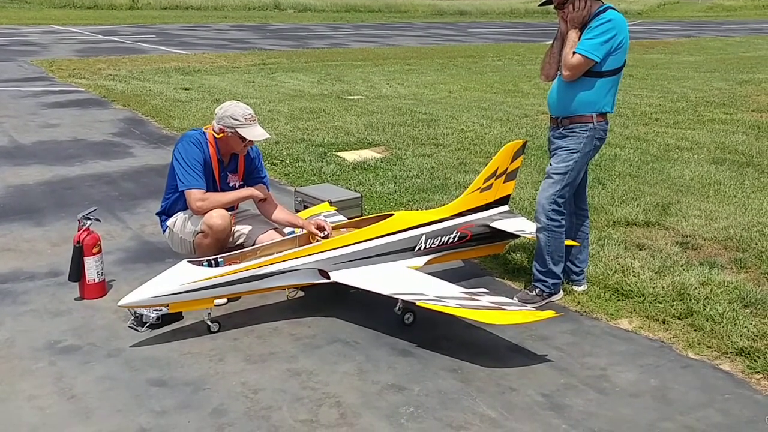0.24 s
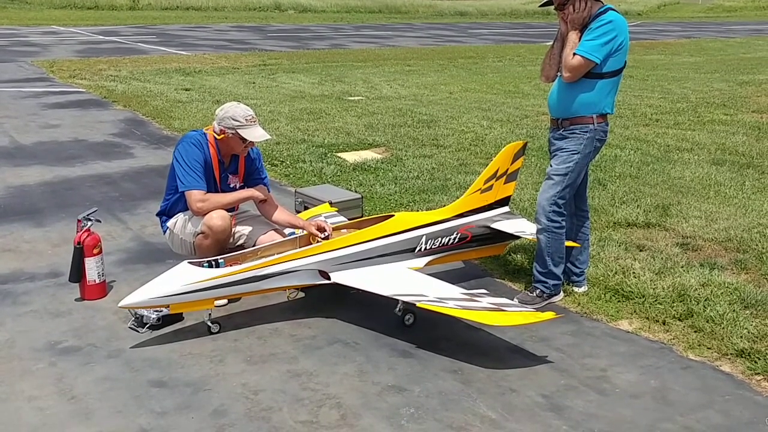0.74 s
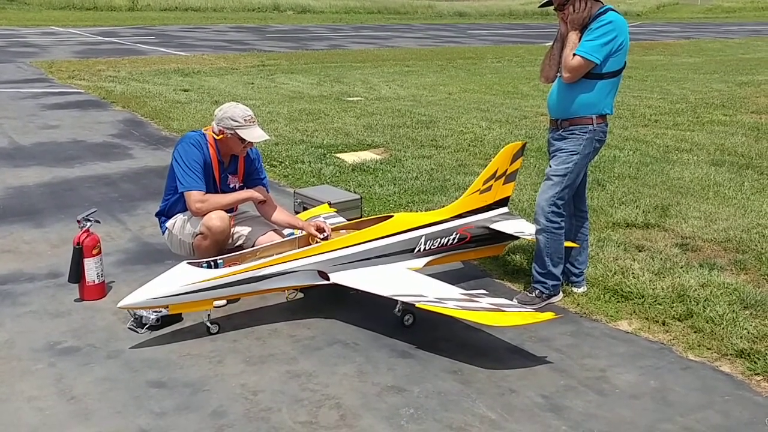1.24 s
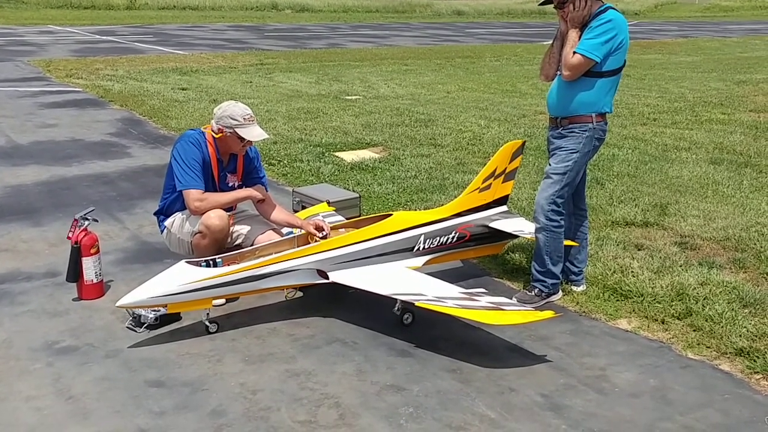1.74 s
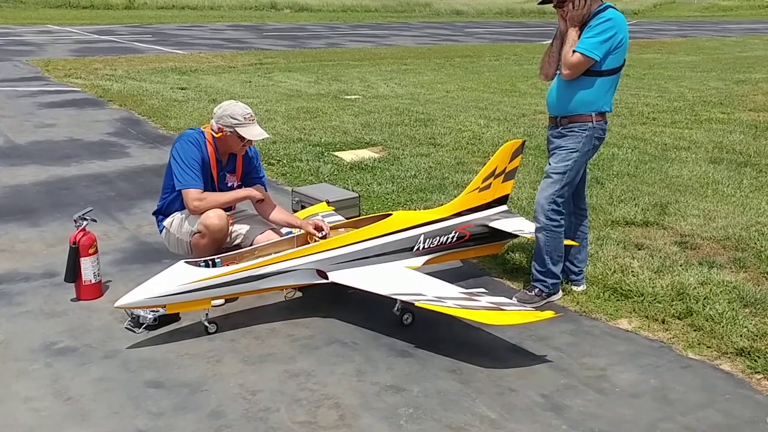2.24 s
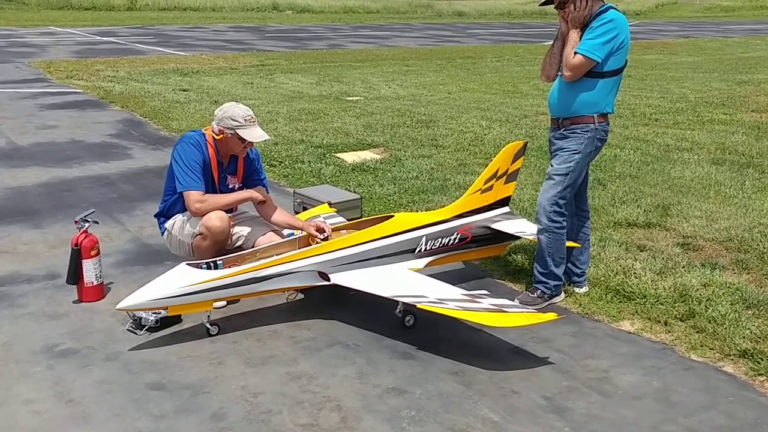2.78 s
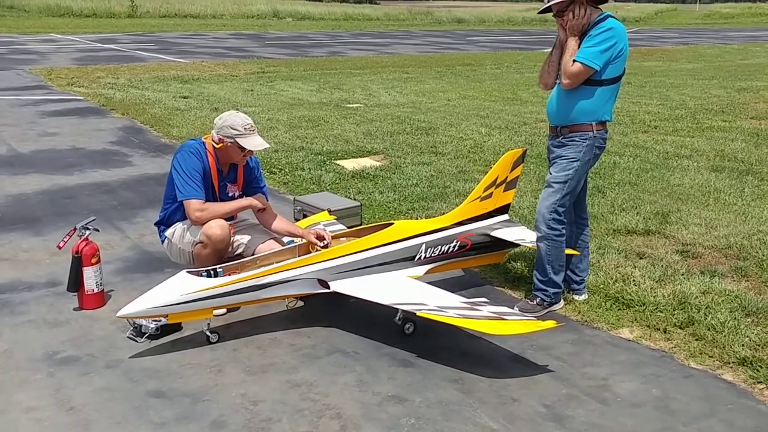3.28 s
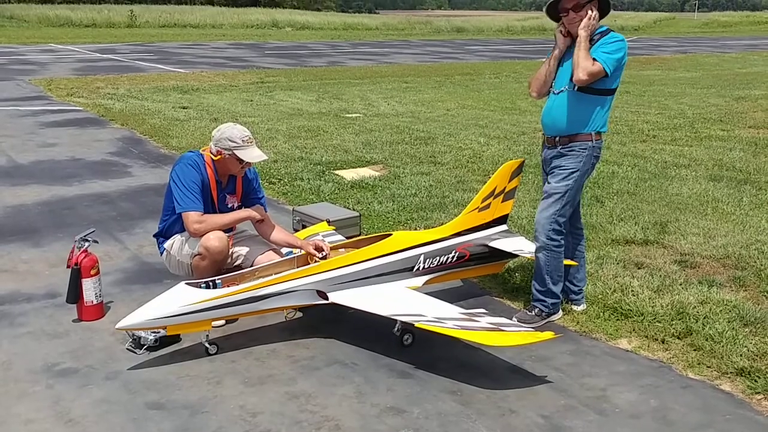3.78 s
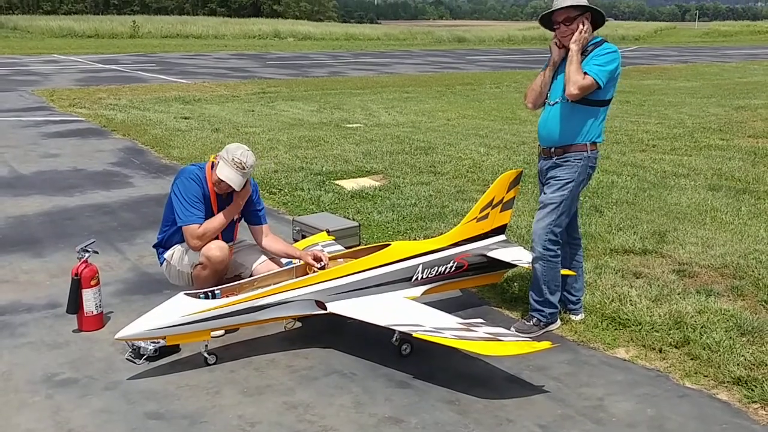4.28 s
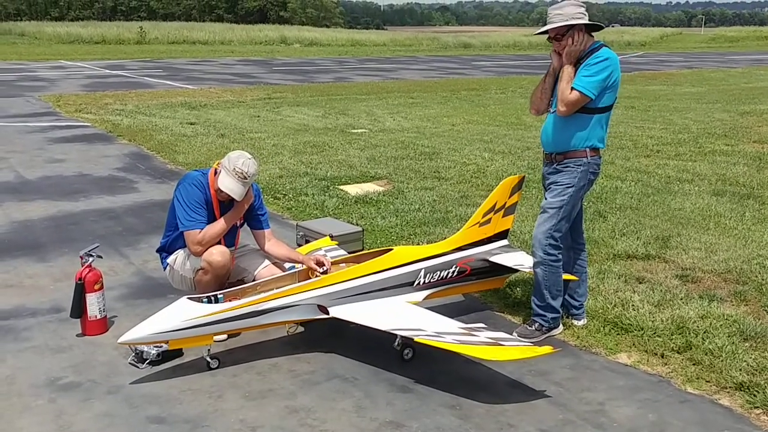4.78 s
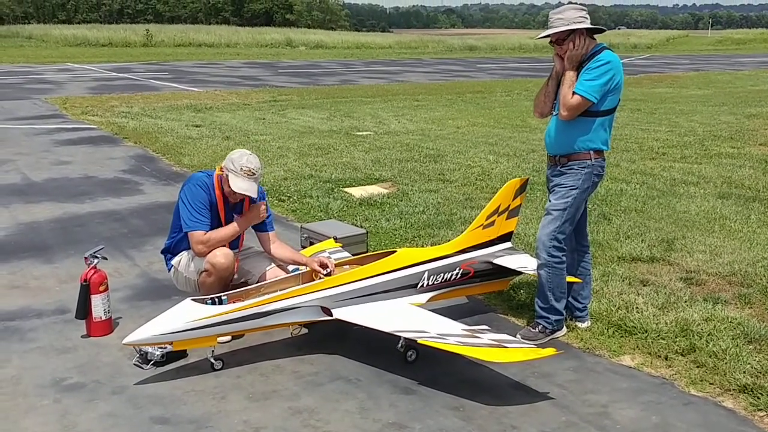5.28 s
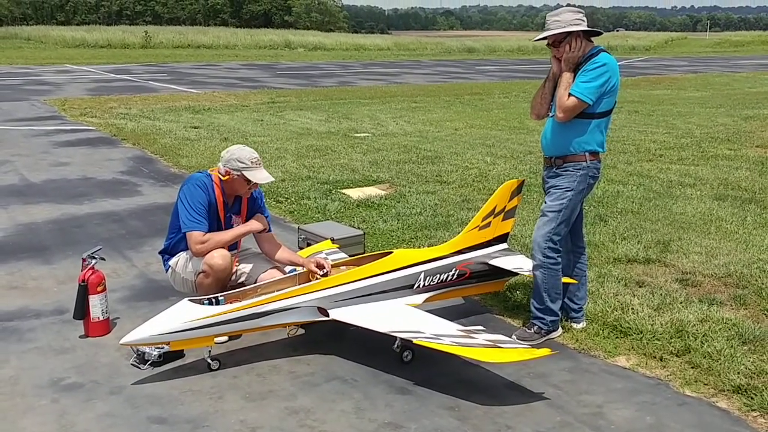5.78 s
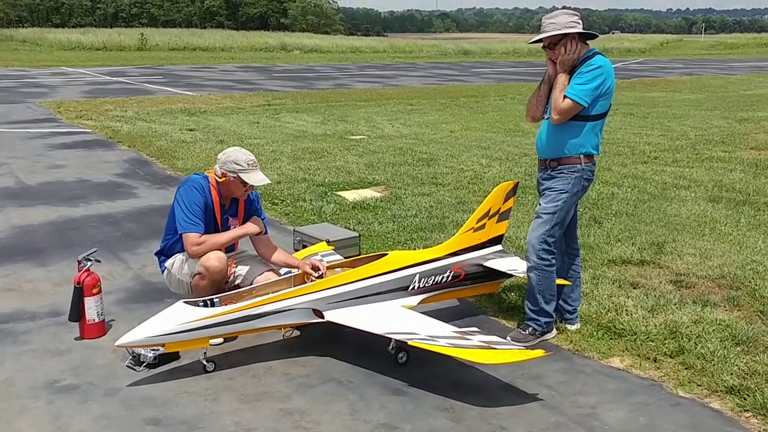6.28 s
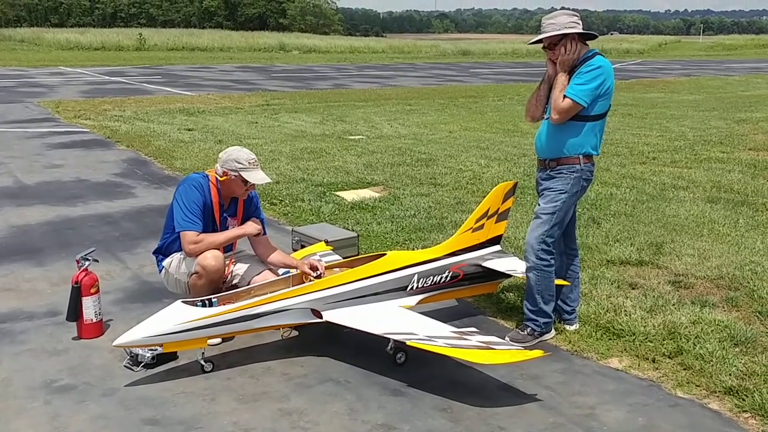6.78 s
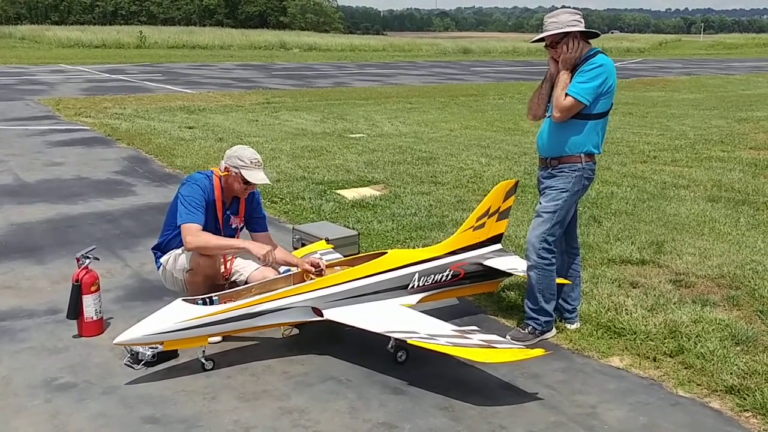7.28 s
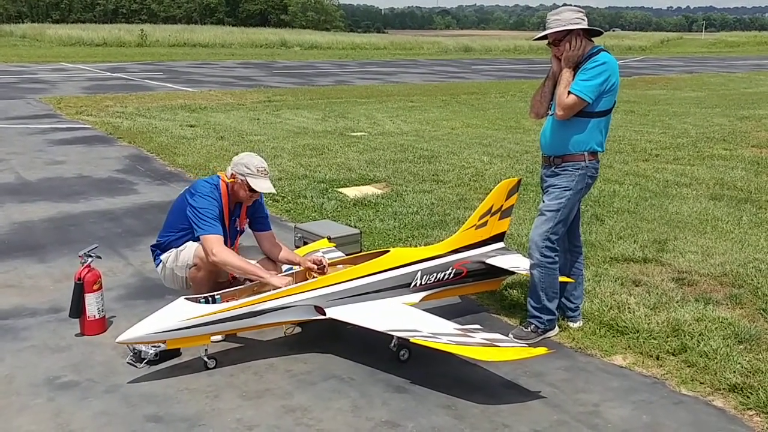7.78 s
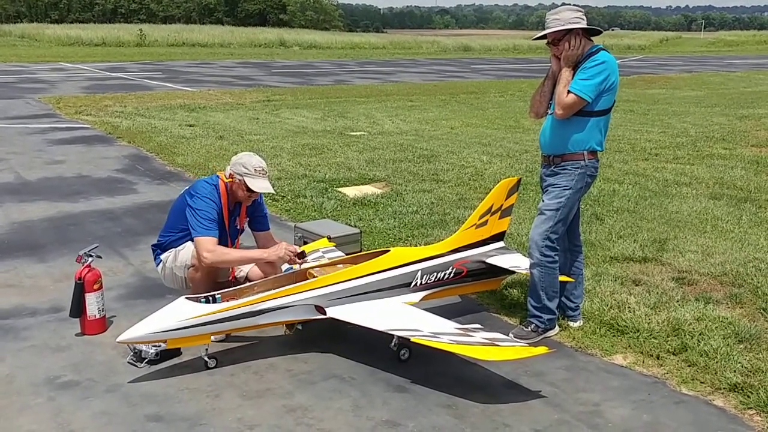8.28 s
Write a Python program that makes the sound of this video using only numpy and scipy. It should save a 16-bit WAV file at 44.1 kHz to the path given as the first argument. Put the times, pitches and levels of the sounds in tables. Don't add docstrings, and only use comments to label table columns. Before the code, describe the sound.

From 0 s a small turbine on a model jet is already whining loudly, a piercing, almost pure tone near 5 kHz with a fainter shrill octave above. It glides upward without a break, around 5.7 kHz at 3 s, 6.6 kHz at 5 s and 7.3 kHz at 7 s, then levels near 7.45 kHz from about 7.5 s to the end at 8.5 s. The tone shimmers, dips briefly and slides between left and right, stronger on the right at first. Under it, a hollow tailpipe hum around 550 Hz gradually sinks while duct and intake hiss brightens. Low, uneven wind puffs bump the microphone, most in the first 3 s, with a sharper left-side one near 5.4 s. Open, dry outdoor space; a phone a few metres away sounds compressed, crunchy and slightly overloaded.

```python
import sys
import numpy as np
from scipy import signal
from scipy.fft import rfft, irfft
from scipy.io import wavfile
from scipy.ndimage import uniform_filter1d, minimum_filter1d

SR = 44100
rng = np.random.default_rng(int(sys.argv[2]) if len(sys.argv) > 2 else 0)


def volts_from_decibels(level):
    exponent = np.asarray(level, float) / 20
    return 10 ** exponent


def put_to_file(sound):
    columns = np.atleast_2d(sound).T
    safe = np.clip(columns, -1, 1)
    whole_steps = np.round(safe * 32767)
    wavfile.write(sys.argv[1], SR, whole_steps.astype(np.int16))


N = 376168
FREQ_HZ = np.fft.rfftfreq(N, 1 / SR)
TOP_HZ = 15760
LEAD_S = 4.5e-5

# t/s, f/Hz
BLADE_RATE = [(0.0, 4934), (1.2, 5225), (1.8, 5386), (2.4, 5548), (3.0, 5747), (3.6, 5984), (4.0, 6165),
              (4.4, 6368), (5.0, 6632), (5.4, 6795), (5.9, 6985), (6.45, 7193), (6.95, 7342), (7.3, 7400),
              (7.67, 7462), (8.06, 7476), (8.3, 7470), (8.53, 7457)]
# t/s, left level/dB, right level/dB, octave left level/dB, octave right level/dB
PATH_LEVELS = [(0.0, -11.1, -2.0, -20.0, -20.0), (1.4, -7.0, -5.0, -12.0, -20.0),
               (3.0, -6.4, -6.8, -14.0, -28.0), (4.6, -8.4, -3.9, -28.0, -28.0),
               (6.5, -6.4, -4.5, -7.0, -36.0), (8.53, -5.3, -4.3, -23.0, -33.0)]
# t/s, x0.5 left level/dB, x0.5 right level/dB, x1.5 left level/dB, x1.5 right level/dB
SPLITTERS = [(0, -48, -48, -40, -34), (1.16, -47, -46, -43, -43), (1.75, -56, -53, -50, -52),
             (2.4, -40, -50, -39, -48), (3, -34, -38, -49, -58), (4.5, -35, -43, -38, -49),
             (5.3, -34, -43, -33, -43), (5.85, -25, -30, -28, -46), (6.2, -25, -35, -37, -55),
             (6.46, -35, -39, -39, -47), (6.66, -28, -31, -42, -50), (7.2, -38, -45, -42, -52),
             (7.6, -31, -35, -28, -38), (8.53, -32, -36, -33, -35)]
# t/s, left level/dB, right level/dB
TRIPLE = [(0, -38, -37), (.25, -26, -41), (.6, -38, -46), (1.15, -27, -47), (1.5, -38, -46)]
# t/s, left level/dB, right level/dB
FIVE_HALVES = [(0, -47, -44), (1, -51, -66.5), (3, -55, -55), (3.7, -45, -63), (4.1, -31, -50),
               (4.5, -32, -55)]
# t/s, lead/cycles
PORT_LEAD = [(0.0, 1.08), (0.6, 0.24), (1.3, 0.48), (2.0, 0.34), (2.7, 0.65), (3.4, 0.57), (4.0, 1.02),
             (4.6, 0.5), (5.2, 1.09), (5.8, 0.78), (6.4, 0.12), (6.8, 0.21), (7.1, 0.11), (7.4, -0.42),
             (7.7, 0.13), (8.1, 0.33), (8.53, 0.65)]
# t/s, half length/s, depth/dB, slip/cycles
FADES_LEFT = [(0.213, 0.233, 7.6, 0.21), (0.457, 0.073, 3.8, 0.3), (1.161, 0.088, 9.6, 0.69),
              (1.775, 0.078, 2.4, 0.25), (2.375, 0.049, 13.0, 0.6), (2.698, 0.025, 3.6, 0.12),
              (2.867, 0.086, 12.2, -0.37), (3.244, 0.047, 7.2, 0.68), (3.609, 0.084, 2.0, -0.67),
              (3.749, 0.076, 14.8, 0.54), (4.126, 0.077, 4.4, 0.89), (4.389, 0.054, 6.5, -0.47),
              (4.951, 0.042, 12.3, -0.9), (5.239, 0.047, 3.0, 0.41), (5.391, 0.034, 4.0, -0.14),
              (5.699, 0.074, 6.2, 0.04), (6.16, 0.063, 12.3, 0.66), (6.365, 0.101, 2.6, 0.66),
              (6.629, 0.09, 2.8, 0.12), (6.771, 0.029, 0.0, -0.18), (7.178, 0.106, 1.6, 0.67),
              (7.349, 0.123, 0.0, 0.28), (7.47, 0.085, 1.1, -0.32), (7.678, 0.031, 3.4, -0.25),
              (8.242, 0.012, 3.2, 0.23), (8.246, 0.203, 1.4, -0.82), (8.337, 0.017, 4.5, -0.06)]
# t/s, half length/s, depth/dB, slip/cycles
FADES_RIGHT = [(0.1, 0.131, 19.3, 0.29), (0.361, 0.095, 7.8, -0.11), (0.641, 0.14, 12.5, -0.79),
               (0.918, 0.078, 5.9, 0.32), (1.175, 0.158, 6.1, -0.08), (2.181, 0.054, 6.5, 0.51),
               (2.235, 0.234, 1.9, -0.16), (2.843, 0.045, 7.3, -0.6), (3.164, 0.055, 6.3, -0.23),
               (3.439, 0.051, 7.8, -0.51), (3.914, 0.037, 8.0, 0.48), (4.124, 0.013, 13.1, 0.75),
               (4.219, 0.179, 6.6, 0.27), (4.329, 0.029, 13.9, 0.06), (4.639, 0.063, 2.1, 0.23),
               (4.807, 0.078, 0.9, 0.33), (5.125, 0.046, 2.0, 0.21), (5.516, 0.027, 14.4, 0.62),
               (5.619, 0.158, 2.4, -0.9), (6.265, 0.012, 3.2, 0.03), (6.563, 0.179, 1.6, 0.64),
               (7.419, 0.046, 0.0, 0.15), (8.456, 0.037, 1.9, 0.03)]
# t/s, half length/s, depth/dB
OCTAVE_FADES_LEFT = [(0.17, 0.04, 16.0), (0.56, 0.05, 15.0), (0.77, 0.11, 6.0), (1.44, 0.09, 8.0),
                     (1.69, 0.11, 12.0), (2.28, 0.2, 16.0), (2.69, 0.13, 17.0), (3.12, 0.06, 10.0),
                     (3.37, 0.04, 10.0), (3.63, 0.25, 11.0), (4.21, 0.02, 12.0), (5.59, 0.11, 14.0),
                     (5.96, 0.3, 11.0), (6.72, 0.3, 21.0), (7.36, 0.26, 15.0), (7.91, 0.19, 10.0)]
# t/s, half length/s, depth/dB
OCTAVE_FADES_RIGHT = [(0.41, 0.07, 19.0), (0.59, 0.08, 18.0), (1.05, 0.07, 12.0), (1.62, 0.05, 17.0),
                      (1.84, 0.3, 8.0), (2.6, 0.03, 16.0), (4.49, 0.1, 16.0), (6.75, 0.16, 13.0),
                      (7.0, 0.11, 11.0), (7.11, 0.04, 15.0)]
# f/Hz, level/dB per Hz
TAILPIPE = [(170, -55), (220, -51), (250, -51.5), (390, -50.5), (440, -45), (500, -38.5), (550, -34),
            (595, -37), (640, -47.5), (680, -47.5), (740, -58.5), (1090, -59), (1180, -67), (1250, -62.5)]
# f/Hz, level/dB per Hz
DUCT = [(1410.0, -65), (1850.0, -66), (2240.0, -62.5), (2390.0, -68.5), (2700.0, -66.5), (2890.0, -59),
        (3190.0, -61), (3290.0, -55), (3370.0, -56.5), (3460.0, -54.5), (3700.0, -62.5), (4230.0, -59.5),
        (4680.0, -63.5), (5090.0, -63.5)]
# f/Hz, level/dB per Hz
INTAKE = [(5250.0, -61.5), (7270.0, -60.5), (8540.0, -67.5), (9000.0, -72.5), (9800.0, -65), (10520.0, -61),
          (12390.0, -72), (12660.0, -75.5), (13030.0, -73), (13390.0, -70), (15200.0, -76), (15590.0, -77)]
# f/Hz, left minus right level/dB
BODY_SHADOW = [(300.0, 2), (2330.0, 0.5), (2910.0, 2), (3520.0, 2.5), (4250.0, -2), (5390.0, 2),
               (6660.0, -6), (8300.0, 4.5), (9040.0, 1.8), (10280.0, 10.5), (11150.0, 3.5), (12720.0, 5),
               (15590.0, 11.5)]
# f/Hz, share/0-1
LIKENESS = [(100, 0.7), (250, .85), (500, 1), (1200, .8), (2400, .65), (3300, .85), (4000, .55),
            (8000, .25)]
SPOOL_EDGES_HZ = [0, 400, 750, 5000, 9000, 11800, 27000]
SPOOL_DB = [0, -4, 0.2, 4, 4.5, 7.5]
# f/Hz, level/dB per Hz
BUFFET = [(15, -18), (33, -17.5), (60, 0.5), (120, -5), (200, -8.5), (350, -10.5), (800, -33.5),
          (3000, -56.5)]
# t/s, half length/s, left level/dB, right level/dB
GUSTS = [(0, 0.092, -21, -38), (0.397, 0.14, -15, -18), (0.638, 0.15, -28, -13.5), (1.127, .09, -18, -18.5),
         (1.437, .15, -28, -28), (2.02, 0.07, -34, -22.5), (2.292, .15, -26.5, -18),
         (2.622, 0.081, -28, -17), (3.848, 0.037, -35, -45), (4.73, 0.078, -24.5, -36),
         (5.138, 0.069, -33, -21.5), (5.395, 0.043, -9.5, -39), (5.5, 0.053, -26, -24),
         (6.065, 0.1, -23.5, -48), (7.247, 0.14, -31.5, -48), (7.626, 0.061, -35, -35),
         (8.05, .12, -32, -45)]
# f/Hz, level/dB per Hz
MASKED = [(300, -81.5), (2500, -70), (5000, -67.5), (9000, -70.5), (10500, -71.5), (12500, -70),
          (15500, -78)]


def columns(table):
    t_s, *rest = np.transpose(table)
    return np.array([np.interp(np.arange(N) / SR, t_s, c) for c in rest])


def shape(points):
    hz, value = np.transpose(points)
    return np.interp(np.log(FREQ_HZ + 1), np.log(hz), value)


def white():
    return rfft(rng.standard_normal(N)) * np.sqrt(SR / 2)


def walk(rate_hz):
    k = int(SR / rate_hz)
    held = np.repeat(rng.standard_normal(N // k + 1), k)
    return 1.8 * uniform_filter1d(uniform_filter1d(held, k), k)[:N]


def whine(left_db, right_db, octave_left_db, octave_right_db, lead_cycles):
    hz = columns(BLADE_RATE)[0]
    turn = 2 * np.pi * np.cumsum(hz) / SR
    halves_db = columns(SPLITTERS)
    tones = [
        (1, [left_db, right_db]),
        (2, [octave_left_db, octave_right_db]),
        (0.5, halves_db[:2]),
        (1.5, halves_db[2:]),
        (3, columns(TRIPLE)),
        (2.5, columns(FIVE_HALVES)),
    ]
    out = 0
    for k, db in tones:
        shimmer_db = 0.6 * (k + 0.5) * np.array([walk(30), walk(30)])
        shimmer_db = shimmer_db + 3 * (k % 1 > 0) * walk(6)
        wobble = 0.065 * k * np.array([walk(30), walk(30)])
        shift = lead_cycles if k % 1 == 0 else LEAD_S * hz
        phase = k * (turn + np.pi * np.array([shift, -shift])) + wobble
        in_range = k * hz < TOP_HZ + 300
        out = out + np.sqrt(2) * volts_from_decibels(db + shimmer_db) * np.sin(phase) * in_range
    return out


def dips(table, t_s):
    centre_s, half_s, depth_db = np.transpose(table)[:3, :, None]
    u = (t_s - centre_s) / half_s
    return np.sum(depth_db * np.exp(-u ** 2), axis=0), u


def paths():
    coarse = np.arange(0, N, 64)

    def full(v):
        return np.interp(np.arange(N), coarse, v)

    tables = (FADES_LEFT, FADES_RIGHT, OCTAVE_FADES_LEFT, OCTAVE_FADES_RIGHT)
    fades = [dips(table, coarse / SR) for table in tables]
    slips = [np.transpose(table)[3] @ np.arctan(2 * u) / np.pi
             for table, (_, u) in zip(tables[:2], fades)]
    db = columns(PATH_LEVELS) - np.array([full(loss_db) for loss_db, _ in fades])
    return *db, columns(PORT_LEAD)[0] + full(slips[0] - slips[1])


def rush():
    hz = columns(BLADE_RATE)[0]
    speed = ((hz - hz.min()) / np.ptp(hz)) ** 1.4
    speed = speed - speed.mean()
    like = np.clip(shape(LIKENESS), 0, 1)
    engine_db = shape([(30, -75), (70, -57), (135, -48.5), *TAILPIPE, *DUCT, *INTAKE])
    shared = white()
    flicker_db = [0.82 * walk(7) + 0.55 * walk(1.504) for _ in SPOOL_DB]
    out = np.zeros((2, N))
    for side, lag_s in enumerate((0, LEAD_S)):
        colour_db = engine_db + (0.5 - side) * shape(BODY_SHADOW)
        common = np.sqrt(like) * shared * np.exp(-2j * np.pi * FREQ_HZ * lag_s)
        heard = common + np.sqrt(1 - like) * white()
        for lo, hi, db, flick_db in zip(SPOOL_EDGES_HZ, SPOOL_EDGES_HZ[1:], SPOOL_DB, flicker_db):
            band = irfft(heard * volts_from_decibels(colour_db) * (FREQ_HZ >= lo) * (FREQ_HZ < hi), N)
            out[side] += band * volts_from_decibels(db * speed + flick_db)
    return out


def gusts():
    breeze_db, breeze_db_per_s = -30, -1.62
    t_s = np.arange(N) / SR
    power = volts_from_decibels(2 * (breeze_db + breeze_db_per_s * t_s)) * np.ones((2, 1))
    for centre_s, half_s, *db in GUSTS:
        swell = np.exp(-((t_s - centre_s) / half_s) ** 2)
        power = power + volts_from_decibels(2 * np.array(db))[:, None] * swell
    return 10 * np.log10(power)


def wind(gust_db):
    eddies = np.array([irfft(white() * volts_from_decibels(shape(BUFFET)), N) * volts_from_decibels(2.2 * walk(11)) for _ in gust_db])
    return eddies / eddies.std(axis=1, keepdims=True) * volts_from_decibels(gust_db + 1.7)


def scene():
    open_db = np.array([[4], [6.5]])
    duck_db = np.array([[15], [21]])
    duck_s, air_s, air_share = 0.13, 0.55, 1.5
    drops_s, drop_s = [1.1, 5.325, 6.27, 7.175], 0.011
    heard = paths()
    engine, breeze = rush(), wind(gusts())
    power = uniform_filter1d(volts_from_decibels(2 * np.array(heard[:2])), int(duck_s * SR), axis=1)
    power = power + air_share * uniform_filter1d((engine + breeze) ** 2, int(air_s * SR), axis=1)
    gain_db = open_db - duck_db * power
    tones = whine(*heard)
    lost = sum(np.exp(-((np.arange(N) / SR - s) / drop_s) ** 4) for s in drops_s)
    tones = tones - lost * tones.mean(axis=0)
    return volts_from_decibels(-0.22) * tones + volts_from_decibels(gain_db) * engine + volts_from_decibels(1.5) * breeze


def limit(x, top, hold_s):
    k = int(hold_s * SR)
    need = minimum_filter1d(np.minimum(1, top / (np.abs(x) + 1e-9)), k, axis=1)
    return x * uniform_filter1d(need, k, axis=1)


def squeeze(x, coarse, grain, spread_db, port_db, size=1024, count=8):
    n, k = np.arange(2 * size) + 0.5, np.arange(size) + 0.5
    window = np.sin(np.pi * n / (2 * size))[:, None]
    basis = np.sqrt(2 / size) * window * np.cos(np.pi / size * np.outer(n + size / 2, k))
    blocks = np.pad(x, ((0, 0), (size, 2 * size - N % size))).reshape(2, -1, size)
    lines = np.concatenate([blocks[:, :-1], blocks[:, 1:]], axis=2) @ basis
    bands = lines.reshape(2, -1, size // count, count)
    hz, db = np.transpose(MASKED)
    centre_hz = (np.arange(size // count) + 0.5) * count * SR / (2 * size)
    whole = rng.standard_normal((1, bands.shape[1], 1))
    groups = np.repeat(rng.standard_normal((1, bands.shape[1], bands.shape[2] // 4)), 4, axis=2)
    wander = uniform_filter1d(whole + groups, size=3, axis=1)
    mask_db = np.interp(centre_hz, hz, db) + spread_db * wander + port_db
    mask = (volts_from_decibels(mask_db) * np.sqrt(SR / 2))[..., None]
    heard = np.sqrt(np.mean(bands ** 2, axis=3, keepdims=True)) > mask
    fine = np.minimum(centre_hz / 4000, 1)[:, None]
    step = np.maximum(coarse * mask, fine * grain * np.median(np.abs(bands), axis=3, keepdims=True))
    kept = np.sign(bands) * np.floor(np.abs(bands) / step + 0.4) * step * heard
    frames = kept.reshape(lines.shape) @ basis.T
    return (frames[:, :-1, size:] + frames[:, 1:, :size]).reshape(2, -1)[:, :N]


def top_cut(x):
    return signal.sosfilt(signal.butter(12, 15780, fs=SR, output="sos"), x)


def record(dry):
    held = limit(dry * volts_from_decibels(1.5), top=np.array([[1.08], [1.12]]), hold_s=0.0045)
    rounding = 7
    held = held / (1 + np.abs(held / 0.97) ** rounding) ** (1 / rounding)
    cut = signal.sosfilt(signal.ellip(8, 0.2, 70, TOP_HZ, fs=SR, output="sos"), held)
    port_db = np.reshape([0.6, -2.2], (2, 1, 1))
    mix = squeeze(np.clip(cut, -1, 1), coarse=1.6, grain=2.3, spread_db=2.4, port_db=port_db)
    return top_cut(mix)


dry = scene()
out = record(dry)
put_to_file(out)
```